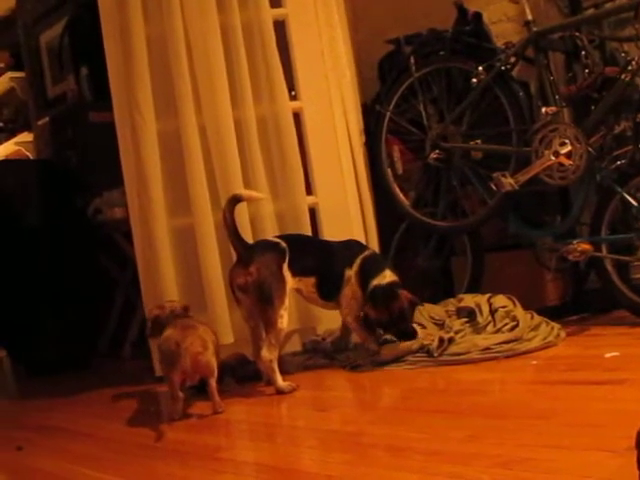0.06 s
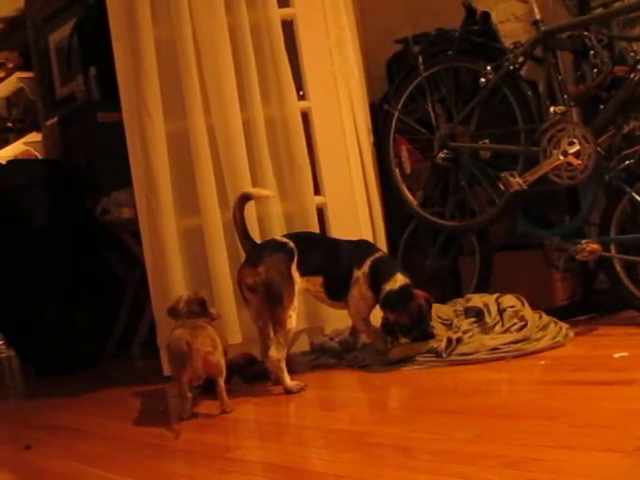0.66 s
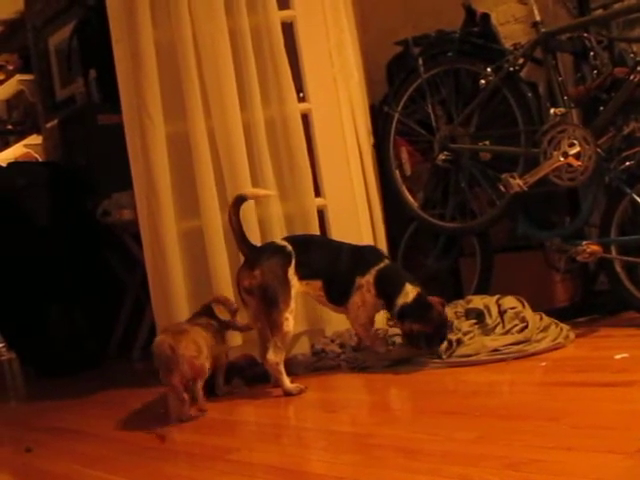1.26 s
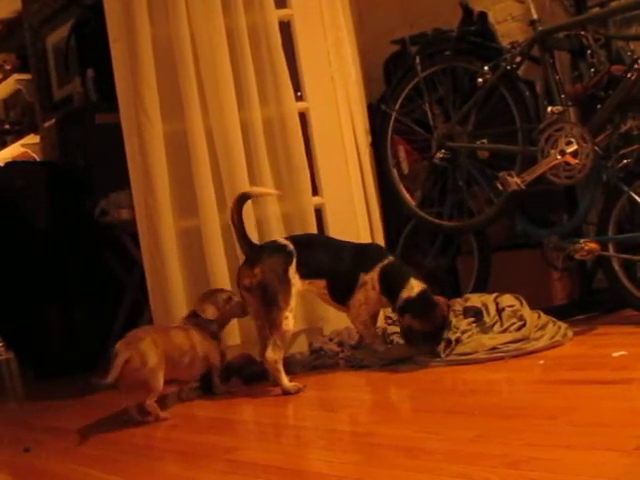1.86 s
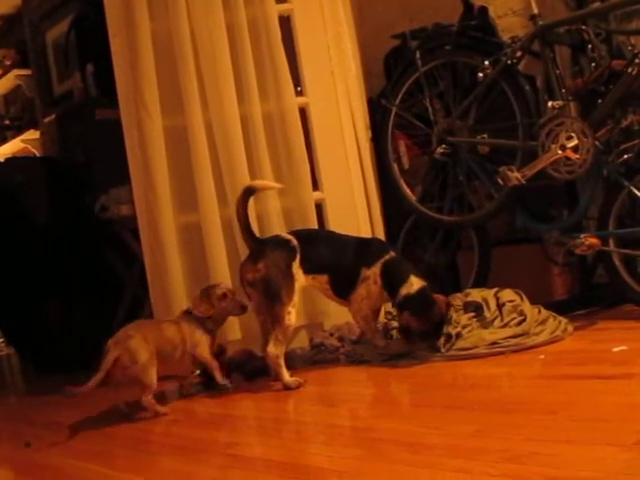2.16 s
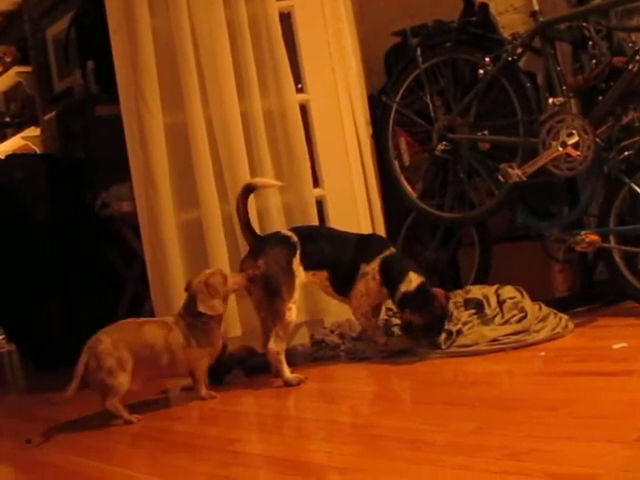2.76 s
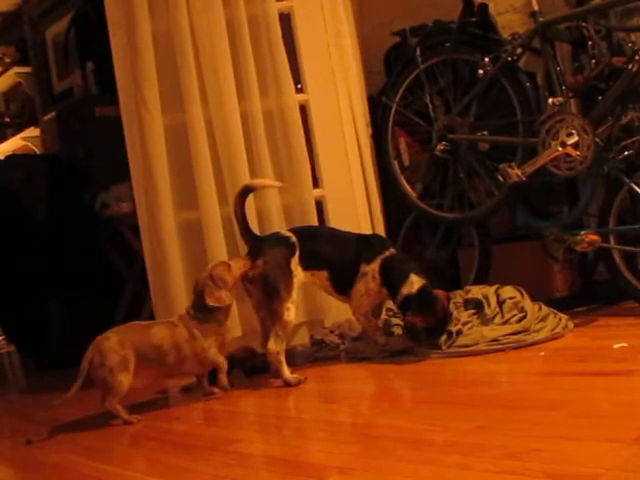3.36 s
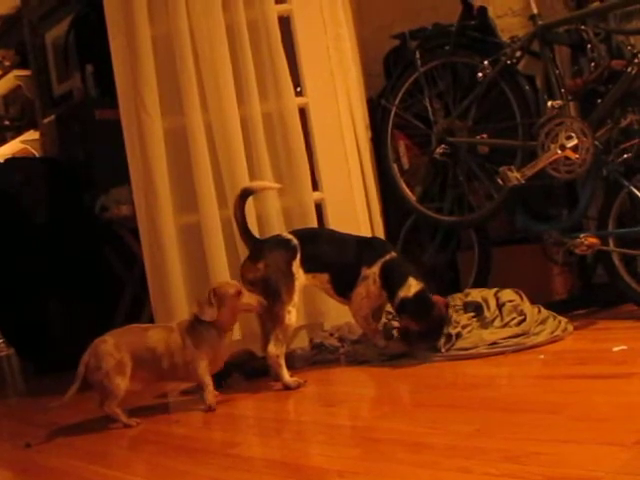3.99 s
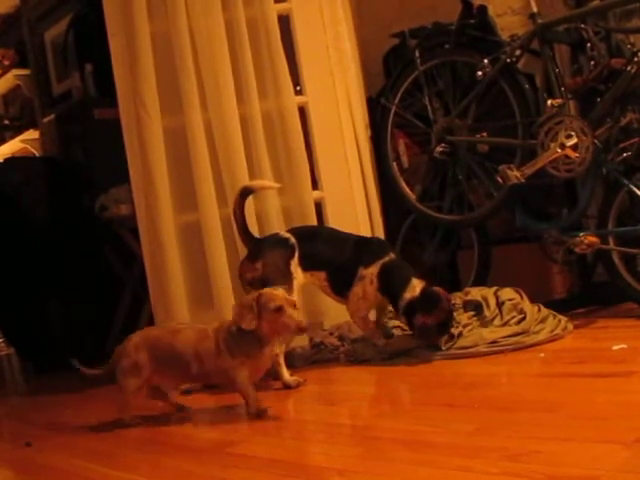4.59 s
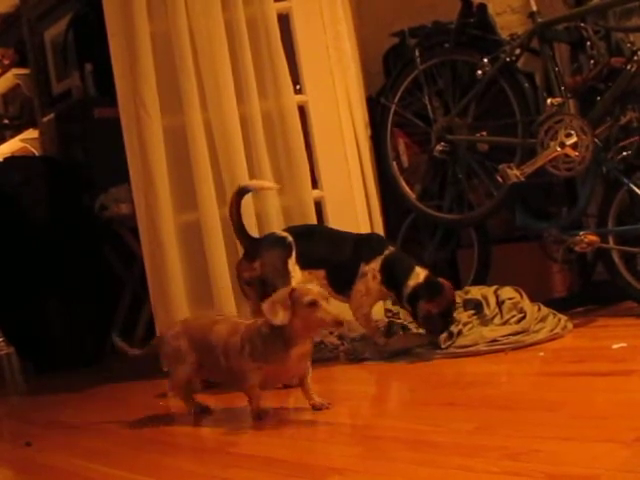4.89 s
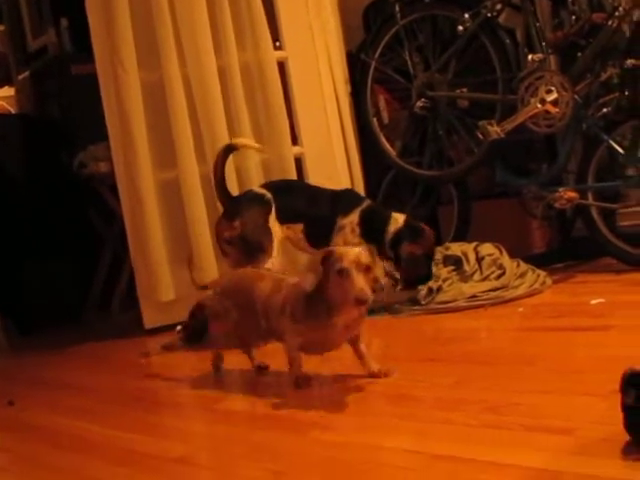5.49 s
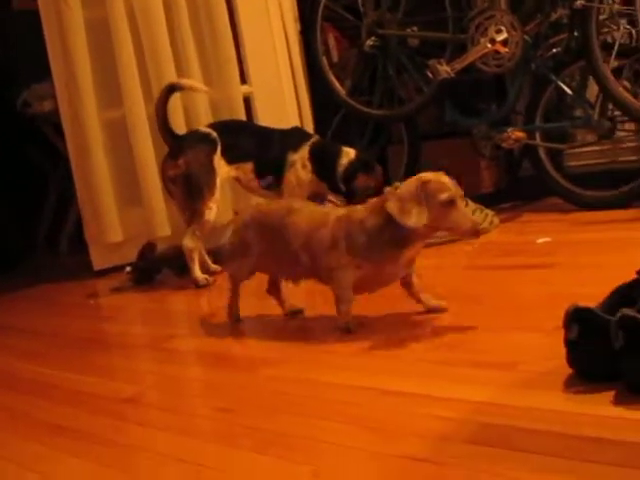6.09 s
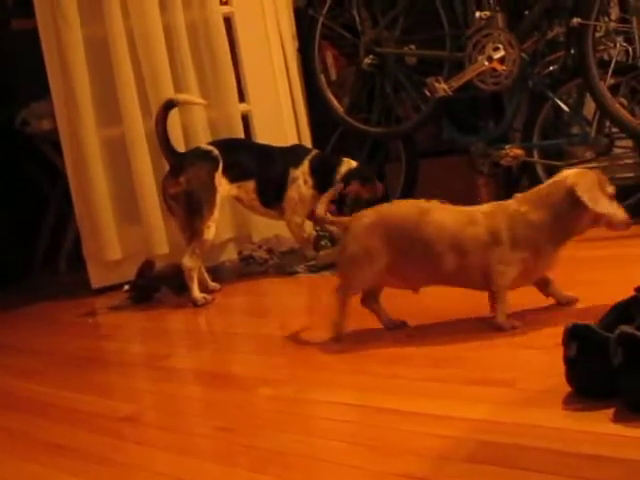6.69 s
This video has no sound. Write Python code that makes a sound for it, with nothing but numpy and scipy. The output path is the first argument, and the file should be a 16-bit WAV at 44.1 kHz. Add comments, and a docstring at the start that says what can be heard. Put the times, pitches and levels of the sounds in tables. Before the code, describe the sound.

A quiet living room holds a steady low rumble, an appliance hum and faint microphone hiss throughout. In the first second or so come a few soft, dull knocks on wood and a faint paw drag. From about 1.3 seconds a small dog shifts on the hardwood floor: a tiny claw squeak, then bright, light ticks with brief scrapes, clearest around 1.5 and 1.7 seconds. The ticks thin out, and between 2.6 and 4 seconds only a few faint taps remain. From about 4.1 seconds the dog walks closer, its claws clicking and chattering in a quicker, uneven patter, with short scrapes as the paws roll off and soft knocks between. The strongest steps fall near 4.4, 5, 5.6, 5.9 and 6.5 seconds, and a last soft knock comes near 6.7. Everything is fairly quiet, with a short room ring.

```python
"""Small dog on a hardwood floor

A small dog shifts about, then walks closer in a quiet living room. Its claws tick and chatter
on the boards and scrape as the paws roll off; a few soft, dull knocks come between.
The room rings briefly over a low rumble, an appliance hum and the microphone's hiss."""
import sys
import numpy as np
from scipy import signal
from scipy.fft import rfft, irfft, next_fast_len
from scipy.io import wavfile
from scipy.ndimage import uniform_filter1d

SR = 44100
rng = np.random.default_rng(int(sys.argv[2]) if len(sys.argv) > 2 else 0)


def generate_wav(signal):
    """Clip the signal to [-1, 1] and save it as 16-bit WAV at the path in sys.argv[1]."""
    frames = np.transpose(np.atleast_2d(signal))
    scaled = np.clip(frames, -1, 1) * 32767
    pcm = np.round(scaled).astype(np.int16)
    wavfile.write(sys.argv[1], SR, pcm)


N = 297234
T = np.arange(N) / SR

# Footfalls: start_s, second_claw_lag_s, first_claw_db, second_claw_db, board_db
FOOTFALLS = [(1.5315, 0.0057, -51, -41, -49.5), (1.7463, .009, -47.5, -37, -46.5),
             (2.183, .0077, -61, -49, -67), (2.2959, 0.0094, -48, -48.5, -53.5),
             (2.5632, 0.0095, -53, -45.5, -64), (3.0894, 0.0075, -58, -69, -70),
             (3.6188, 0.008, -66, -56, -58), (4.1277, 0.0093, -61, -47.5, -55),
             (4.3775, 0.012, -44.5, -47, -55), (4.397, 0.0079, -45, -38.5, -44),
             (4.6027, 0.012, -51.5, -51, -56), (4.6716, 0.01, -48, -44, -48.5),
             (4.9344, 0.0099, -44, -50, -49.5), (4.957, 0.012, -39.5, -41, -49),
             (5.1963, .0104, -54, -51.5, -51), (5.2617, 0.012, -52, -52, -50),
             (5.3887, 0.0094, -56, -53, -50.5), (5.5753, 0.011, -38.5, -45, -45.5),
             (5.8819, .0065, -42, -45, -42.5), (6.447, 0.012, -51, -52, -47), (6.482, .0103, -47, -53, -56),
             (6.5002, 0.0044, -36, -37, -43.5)]
# A lone claw touches down: start_s, level_db
LONE_TAPS = [(1.3818, -54.5), (1.945, -56), (2.3725, -53), (2.903, -53.5), (4.296, -52), (5.8436, -55),
             (5.9933, -50), (6.1163, -67), (6.2977, -51.5), (6.592, -49.5)]


def claw_strikes(outer_lag_s=.0115, outer_fall_db=-10.5, board_fall_db=-7.5, tap_board_db=-17):
    """Contacts as (start_s, claw_db, board_db): a paw's middle claws land, then the lighter outer two."""
    hits = [(start_s, db, db + tap_board_db) for start_s, db in LONE_TAPS]
    for start_s, lag_s, first_db, second_db, board_db in FOOTFALLS:
        paw = [(start_s, first_db), (start_s + lag_s, second_db)]
        for k in (1, 2):
            late_s = (k + rng.uniform(-.2, .2)) * outer_lag_s
            paw.append((start_s + lag_s + late_s, (first_db + second_db) / 2 + k * outer_fall_db))
        hits += [(at_s, db, board_db + k * board_fall_db) for k, (at_s, db) in enumerate(paw)]
    return hits


def chatter(length_s=.0034, ring_s=.0008, count=3, fall_db=-2.0):
    """One tick is a cluster of tiny contacts a moment apart, the later ones lighter."""
    cluster = np.zeros(SR // 20)
    for k in range(count):
        at_s = (k + rng.uniform(0, 0.45)) / count * length_s
        add(cluster, at_s, undb(k * fall_db) * burst(ring_s, size=1024))
    return cluster


# Bright EQ of a claw tick: freq_hz, gain_db
TICK_EQ = [(1500, -23.5), (3000, -3.5), (4500, 4), (6500, 4.5), (8000, 7), (9700, 7.5), (11000, 0.5),
           (13000, -5.5), (16000, -22)]
# Woody EQ of a struck board: freq_hz, gain_db
WOOD_EQ = [(300, -4.5), (700, -9), (1300, -4), (1900, -6), (2400, -5), (3150, -4.5), (4000, -8.5),
           (6000, -8), (12000, -25)]


def claws(tick_gain_db=4, wood_gain_db=4.5, board_rise_s=.00063, board_ring_s=.003):
    """Hard horn on varnish gives a bright tick; the board under it swells and answers lower and longer."""
    tick, wood = np.zeros((2, N))
    for start_s, claw_db, board_db in claw_strikes():
        add(tick, start_s, undb(claw_db + tick_gain_db) * chatter())
        answer = burst(board_ring_s)
        attack = 1 - np.exp(-T[:len(answer)] / board_rise_s)
        add(wood, start_s, undb(board_db + wood_gain_db) * answer * attack)
    return colour(tick, TICK_EQ) + colour(wood, WOOD_EQ)


# Paws dragged over the boards: peak_s, half_length_s, claw_rasp_db, board_rasp_db
PAW_DRAGS = [(.88, .04, -65, -64), (1.454, 0.063, -63, -69.5), (1.636, 0.04, -63.5, -77),
             (1.876, .063, -62.5, -65), (2.372, .04, -64, -71), (3.2, 0.028, -65, -75),
             (4.411, 0.017, -43, -55), (4.687, .032, -51, -64), (5.286, 0.053, -56.5, -62),
             (5.836, .074, -57, -59.5), (5.914, 0.033, -40.5, -50), (6.023, 0.077, -55.5, -58.5),
             (6.48, .05, -60, -64), (6.519, .022, -47, -55.5)]
# A claw squeaks on the varnish: peak_s, level_db, pitch_hz
SQUEAKS = [(1.32, -53.5, 4650), (1.322, -59, 11300), (1.38, -56.5, 11500)]


def paw_slides(roll_lag_s=.016, roll_half_s=.027, roll_db=-8, squeak_half_s=.018, squeak_width_hz=950):
    """Roll-offs, drags and squeaks as (peak_s, half_length_s, level_db, centre_hz, width_hz)."""
    claw_band, board_band = (8200, 7000), (2820, 1530)  # centre_hz, width_hz
    shuffle = (5.9, .98, -66, -66)  # the pads shuffle through the walk: one long, faint drag
    slides = [(start_s + roll_lag_s, roll_half_s, (first_db + second_db) / 2 + roll_db, *claw_band)
              for start_s, _, first_db, second_db, _ in FOOTFALLS]
    for peak_s, half_s, claw_db, board_db in PAW_DRAGS + [shuffle]:
        slides += [(peak_s, half_s, claw_db, *claw_band), (peak_s, half_s, board_db, *board_band)]
    return slides + [(peak_s, squeak_half_s, db, hz, squeak_width_hz) for peak_s, db, hz in SQUEAKS]


def scrapes(slips_per_s=900, scatter_db=4.0, gain_db=-0.5):
    """A dragged claw catches and slips in a dense run of tiny clicks that swells and fades."""
    track = np.zeros(N)
    for peak_s, half_s, db, hz, width_hz in paw_slides():
        size = int(2 * half_s * SR)
        slips = (rng.random(size) < slips_per_s / SR) * rng.choice([-1, 1], size)
        clicks = slips * undb(scatter_db * rng.standard_normal(size))
        rasp = resonate(resonate(clicks, hz, width_hz), hz, min(3 * width_hz, SR / 3))
        add(track, peak_s - half_s, undb(db + gain_db) * np.hanning(size) * unit(rasp))
    return signal.sosfilt(signal.butter(4, [700, 11400], "bandpass", fs=SR, output="sos"), track)


# Resonances of claw and board: centre_hz, width_hz, gain_db
BOARD_MODES = [(1890, 250, -5), (3124, 540, -5), (5760, 330, -26), (8500, 1800, -8), (9770, 640, -4.5)]


def board_ring(x):
    """Every tick and scrape rings the same few resonances."""
    return x + sum(undb(db) * resonate(x, hz, width_hz) for hz, width_hz, db in BOARD_MODES)


# Soft knocks: start_s, ring_db, pitch_hz, thud_db, rattle_db, contact_s
KNOCKS = [(.059, -50, 715, -45, -51, 0.0047), (.424, -52, 750, -50.5, -56.5, 0.0097),
          (.452, -48.5, 288, -54, -72, .026), (.857, -52.5, 855, -45.5, -53, 0.016),
          (1.135, -58, 990, -55, -63, .014), (1.588, -50, 850, -45.5, -66, 0.012),
          (3.622, -55.5, 726, -68, -66, 0.014), (4.418, -48, 530, -48.5, -66, 0.0065),
          (4.954, -44, 1710, -68, -60, 0.0044), (5.268, -47, 827, -47, -62, 0.02),
          (5.554, -53, 333, -49, -72, 0.011), (5.628, -59, 780, -45.5, -70, 0.011),
          (6.023, -51.5, 555, -50, -59, .018), (6.12, -49, 760, -47.5, -71, 0.015),
          (6.285, -46.5, 770, -50, -62, 0.009), (6.66, -49.5, 159, -62, -66, 0.033)]
# Dark EQ of the thud: freq_hz, gain_db
THUD_EQ = [(60, -28), (150, 0.5), (300, -8), (550, -9.5), (800, -12.5), (2000, -33.5), (8000, -54)]


def knocks(ring_q=6, settle_s=.025, settle_db=-8.5, settle_pitch=.97):
    """Padded blows on wood: a hollow ring, a low thud and a little rattle, then a lighter settling blow."""
    ring, thud, rattle = np.zeros((3, N))
    for start_s, ring_db, pitch_hz, thud_db, rattle_db, contact_s in KNOCKS:
        blows = [(start_s, 1, pitch_hz), (start_s + settle_s, undb(settle_db), pitch_hz * settle_pitch)]
        for at_s, gain, hz in blows:
            push = burst(contact_s)
            body = resonate(resonate(push, hz, hz / ring_q), hz, 2 * hz / ring_q)
            add(ring, at_s, gain * undb(ring_db) * unit(body) * np.std(push))
            add(thud, at_s, gain * undb(thud_db) * burst(contact_s))
            add(rattle, at_s, gain * undb(rattle_db) * burst(contact_s))
    return ring + colour(thud, THUD_EQ) + colour(rattle, WOOD_EQ)


def room(x, wet_db, t60_s, build_s=.004, echo_s=.0097, echo_db=-14, blocks=48):
    """Direct sound, a ceiling echo and a short tail; the reflections change as the dog moves."""
    t = T[:SR // 2]
    envelope = (1 - np.exp(-t / build_s)) * np.exp(-np.log(1000) * t / t60_s)
    out, size = x.copy(), N // blocks
    for start in range(0, N, size):
        tail = envelope * rng.standard_normal(len(t))
        tail *= rng.random(len(t)) < .15 + t / .04  # sparse at first, then dense
        response = undb(wet_db) * tail / np.linalg.norm(tail)
        response[int(echo_s * SR)] += undb(echo_db)
        add(out, start / SR, signal.fftconvolve(x[start:start + size], response))
    return out


# Deep EQ of the building's rumble: freq_hz, gain_db
RUMBLE_EQ = [(4, -3), (15, 7), (20, -1), (45, -0.5), (55, -6.5), (70, -9.5), (90, -14), (112, -13.5),
             (135, -21), (165, -18.5), (210, -24.5), (400, -30), (520, -30.5), (1000, -36.5), (1500, -56.5)]
# Airy EQ of the hiss: freq_hz, gain_db
HISS_EQ = [(590, -37), (1000, -3), (1190, -0.5), (1290, -1.5), (1480, -0.5), (1820, -3.5), (3140, -4.5),
           (5040, -7.5), (5650, -8), (6130, -4.5), (6650, -7), (7900, -7.5), (8770, -2.5), (9510, -6.5),
           (15800, -25)]
# Appliance hum and faint whine: pitch_hz, peak_level_db
HUM_TONES = [(59.8, -49.5), (119.8, -63), (414.5, -68), (473.7, -69.5), (6212, -77), (6331, -77)]


def room_tone(rumble_db=-42.5, hiss_db=-62, waver_db=0.6, drift_hz=0.457):
    """Building rumble, even microphone hiss and the slightly wavering hum of an appliance."""
    rumble = undb(rumble_db) * unit(colour(rng.standard_normal(N), RUMBLE_EQ))
    hiss = undb(hiss_db) * unit(colour(rng.standard_normal(N), HISS_EQ))
    hum = np.zeros(N)
    for hz, db in HUM_TONES:
        gain = undb(db - waver_db * drift(rate_hz=3.6))
        pitch_hz = hz + drift_hz * drift(rate_hz=5)
        hum += gain * np.sin(2 * np.pi * np.cumsum(pitch_hz) / SR)
    return rumble + hiss + hum


def undb(db):
    """Decibels to gain."""
    return 10 ** (np.asarray(db) / 20)


def unit(x):
    """Scale to rms 1."""
    return x / np.sqrt(np.mean(x ** 2))


def add(track, start_s, sound):
    """Mix a sound into a track."""
    i = max(int(start_s * SR), 0)
    part = sound[:max(len(track) - i, 0)]
    track[i:i + len(part)] += part


def colour(x, eq):
    """Minimum-phase EQ through (freq_hz, gain_db) points, with unit power gain."""
    size = next_fast_len(N + SR // 2, True) // 2 * 2
    hz, db = np.transpose(eq)
    bins_hz = np.maximum(np.arange(size // 2 + 1) * SR / size, 1)
    gain = unit(undb(np.interp(np.log(bins_hz), np.log(hz), db)))
    cepstrum = irfft(np.log(gain))
    cepstrum[1:size // 2] *= 2  # folded so that nothing rings ahead of a hit
    cepstrum[size // 2 + 1:] = 0
    return irfft(rfft(x, size) * np.exp(rfft(cepstrum)))[:N]


def resonate(x, hz, width_hz):
    """Two-pole resonance, gain 1 at the centre."""
    return signal.lfilter(*signal.iirpeak(hz, hz / width_hz, fs=SR), x)


def drift(rate_hz):
    """Slow random wander with rms 1."""
    size = int(SR / rate_hz)
    stairs = np.repeat(rng.standard_normal(N // size + 1), size)
    return unit(uniform_filter1d(uniform_filter1d(stairs, size), size)[:N])


def burst(decay_s, size=4096):
    """A contact that dies away as noise; its energy grows with its length."""
    fade = np.exp(-np.arange(size) / SR / decay_s)
    return unit(rng.standard_normal(size) * fade) * np.sqrt(np.mean(fade ** 2))


def scene():
    """Paws and slightly drier knocks over a steady bed of room tone, in mono."""
    paws = room(board_ring(claws() + scrapes()), wet_db=-3.0, t60_s=0.26)
    bumps = room(knocks(), wet_db=-7, t60_s=.2)
    return (paws + bumps + room_tone())[None]


def record(dry):
    """A steep low-pass cuts the top of the treble."""
    top_hz = 15750
    return signal.sosfilt(signal.ellip(10, .2, 70, top_hz, fs=SR, output="sos"), dry)


dry = scene()
out = record(dry)
generate_wav(out)
```